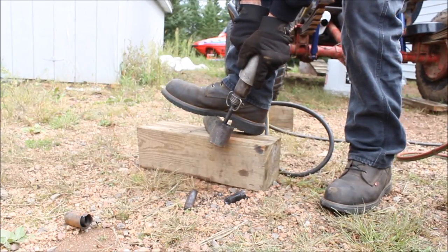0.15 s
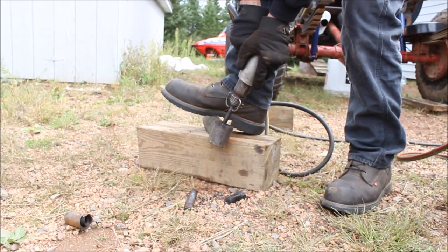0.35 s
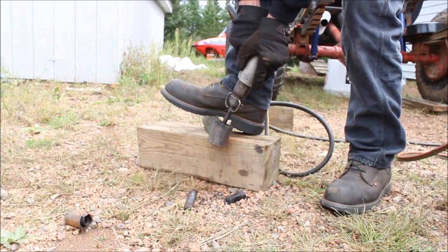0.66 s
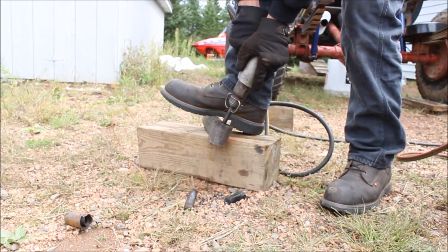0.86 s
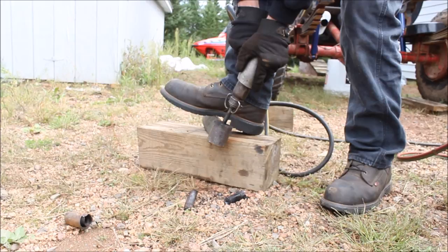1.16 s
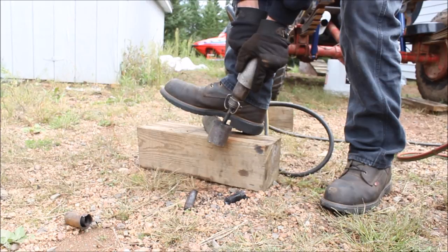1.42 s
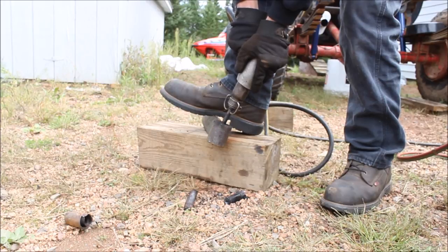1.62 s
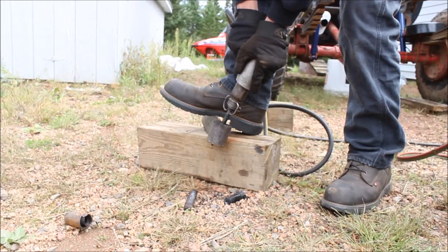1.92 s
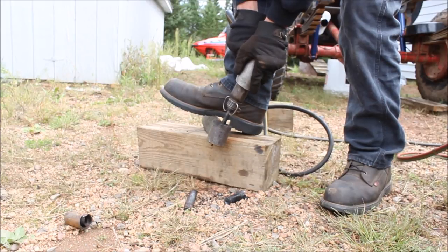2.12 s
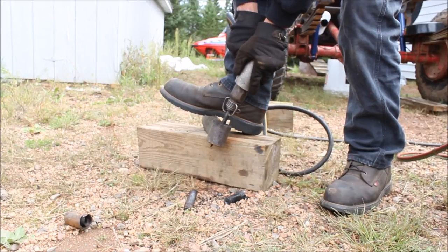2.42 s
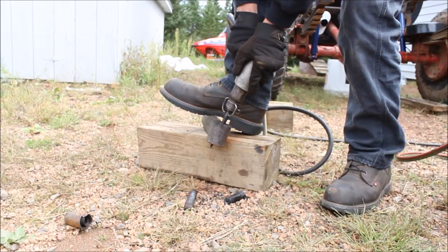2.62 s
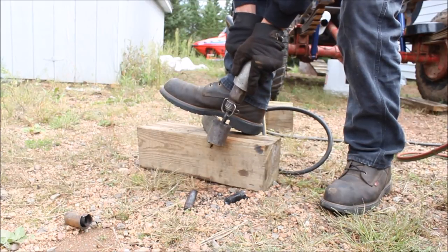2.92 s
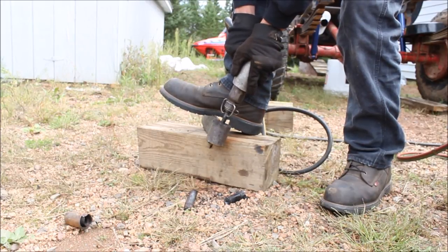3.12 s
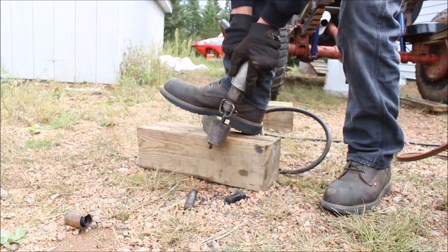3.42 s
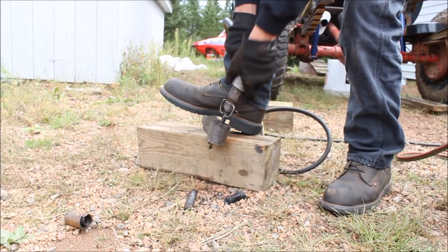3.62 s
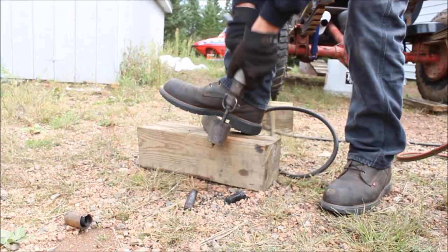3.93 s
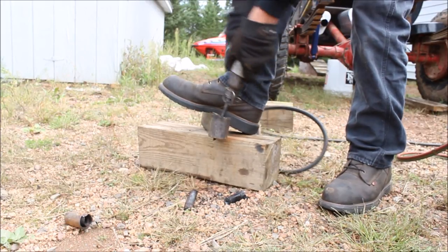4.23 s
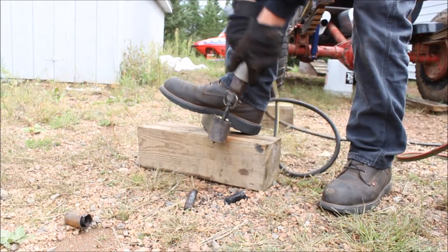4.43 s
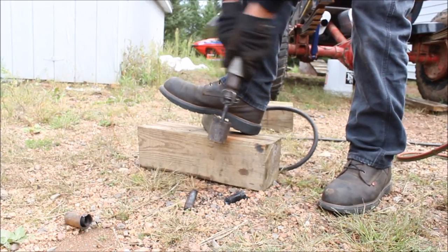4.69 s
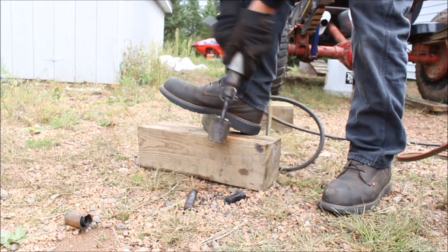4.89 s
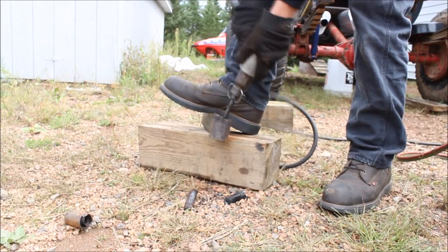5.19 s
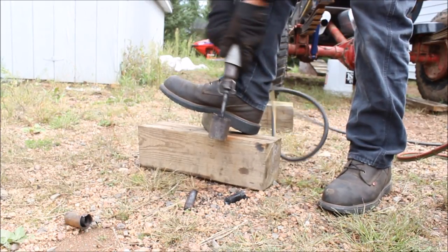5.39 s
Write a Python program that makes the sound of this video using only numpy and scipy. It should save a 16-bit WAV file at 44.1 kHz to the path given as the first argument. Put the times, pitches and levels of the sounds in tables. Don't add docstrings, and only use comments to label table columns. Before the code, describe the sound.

From the start an air hammer runs at full blast, close to a stereo microphone in an open yard. Roughly 43 strokes a second merge into a rough, buzzing rattle: each a dry exhaust pop, a hard piston crack ringing the steel, loose chatter and a puff of hissing air. At first the chisel rings bright and high; from about 1 to 2 seconds it sinks in and sounds tighter and lower. The pace sags gradually to about 40 strokes, the split liner adds a hollow, mid-pitched clang by 3 seconds, and the tool stumbles and stalls near 3.5. A short yard echo dies away. From about 3.6 to 4.2 faint distant wash swells up, with low, soft wind buffets. Small uneven ticks and clanks of the tool in metal follow, mostly from 4.3 to 5.3. At 5.49 a brief whistling valve hiss leads to a single pop at 5.55.

```python
import sys
import numpy as np
from scipy import signal
from scipy.fft import rfft, irfft
from scipy.io import wavfile
from scipy.ndimage import uniform_filter1d

SR = 44100
rng = np.random.default_rng(int(sys.argv[2]) if len(sys.argv) > 2 else 0)


def transcribe(u):
    v = np.clip(np.atleast_2d(u).T, -1, 1)
    q = np.round(v * 32767).astype(np.int16)
    wavfile.write(sys.argv[1], SR, q)


def boost(x):
    u = np.asarray(x, float) / 20
    return 10 ** u


N = 244755
TIME = np.arange(N) / SR

# time_s, air_pressure_db, lean_on_chisel_db, liner_split (0-1)
FORCE = [(0, -32, -30, 0.08), (.5, -32, -27, 0.15), (1.2, -31.5, -26, .2), (1.75, -30.5, -28.5, 0.26),
         (2.05, -32, -28.5, 0.2), (2.3, -34, -29, 0.4), (2.8, -33, -28, 0.5), (2.97, -34.5, -30.5, 1),
         (3.2, -32, -30.5, 0.97), (3.33, -30.5, -31, 0.86), (3.44, -33.5, -33.5, 0.85)]
# pitch_hz, width_hz, level_db
LINER = [(1620, 190, 0)]


def evened(x):
    return x / np.sqrt(np.mean(x ** 2) + 1e-20)


def curve(rows, column):
    return np.interp(TIME, [r[0] for r in rows], [r[column] for r in rows])


def coloured(x, points):
    f, db = np.transpose(points)
    hz = abs(np.fft.fftfreq(4096, 1 / SR))
    gain_db = np.interp(np.log(hz + 1), np.log(f), db)
    log_gain = np.log(boost(np.maximum(gain_db, -90)))
    taps = np.fft.ifft(np.exp(np.conj(signal.hilbert(log_gain)))).real[:2048]
    return signal.oaconvolve(x, taps.reshape((1,) * (x.ndim - 1) + (-1,)), axes=-1)[..., :N]


def low_cut(x, hz):
    return signal.sosfilt(signal.butter(2, hz, "high", fs=SR, output="sos"), x)


def ring(x, modes):
    out = np.zeros(len(x))
    for hz, width_hz, db in modes:
        r, w = np.exp(-np.pi * width_hz / SR), 2 * np.pi * hz / SR
        out += boost(db) * signal.lfilter([0, r * np.sin(w)], [1, -2 * r * np.cos(w), r * r], x)
    return out


def drooping_ring(x, modes, pitch):
    out = np.zeros(len(x))
    for hz, width_hz, db in modes:
        turn = np.exp(2j * np.pi * np.cumsum(hz * pitch) / SR)
        decayed = signal.lfilter([1], [1, -np.exp(-np.pi * width_hz / SR)], x / turn)
        out += boost(db) * (turn * decayed).imag
    return out


def clicks(seconds, sizes):
    at, out = np.clip(seconds * SR, 0, N - 2), np.zeros(N)
    np.add.at(out, at.astype(int), sizes * (1 - at % 1))
    np.add.at(out, at.astype(int) + 1, sizes * (at % 1))
    return out


def humps(train, width_ms):
    hump = np.exp(-.5 * (np.arange(-40, 41) / SR * 1000 / width_ms) ** 2)
    return signal.oaconvolve(train, hump, "same")


def since(at):
    return TIME - np.r_[-9, at][np.searchsorted(at, TIME, "right")]


def ports(x, lag_s):
    hz = np.fft.rfftfreq(N + 45, 1 / SR)
    later = rfft(x, N + 45) * np.exp(-2j * np.pi * hz * lag_s)
    return np.array([x, irfft(later, N + 45)[:N]])


def stroke_times():
    # stroke_number, cycle_ms
    pace = [(0, 22.983), (29, 23.432), (40, 23.759), (64, 24.411), (80, 24.299), (83, 24.608), (87, 24.044),
            (101, 24.494), (104, 25.245), (118, 24.494), (125, 25.553), (129, 25.352), (139, 26.984),
            (141, 30.191)]
    first_pop_s, jitter_s = .00848, .0001
    stroke, cycle_ms = np.transpose(pace)
    cycles = np.interp(np.arange(stroke[-1] + 1), stroke, cycle_ms) / 1000
    steady = first_pop_s - cycles[0] + np.r_[0, np.cumsum(cycles)]
    return steady + jitter_s * rng.standard_normal(len(cycles) + 1)


def return_times(at):
    slow = np.diff(at, prepend=2 * at[0] - at[1]) - .0243
    return at + .0113 + 0.67 * slow + 77.0 * slow ** 2


def slower_s(at):
    return .3 * (np.gradient(at) - .024)


def pops(at):
    # delay_ms, signed_gain
    echoes = [(0, 1.5), (.5, -.25), (1.45, -.95), (2.9, .28), (3.2, .15), (4.2, .42), (6.0, -.24),
              (9.4, .2)]
    # pitch_hz, width_hz, level_db
    port_modes = [(983, 104, -11), (1150, 150, -4.5)]
    # pitch_hz, width_hz, level_db
    block = [(84.4, 30, -28), (179, 21.5, -40), (211, 33, -32.5), (294.3, 24.7, -30.5), (407, 47, -29.5),
             (526, 203, -18.5)]
    size = boost(.7 * rng.standard_normal((len(at), 2)))
    back = clicks(return_times(at) + .00008 * rng.standard_normal(len(at)), size[:, 1])
    out = humps(clicks(at, size[:, 0]), width_ms=.11)
    puff = out - 0.48 * humps(back, width_ms=0.093)
    blow_s = at + 0.00393 + 0.0003 * rng.standard_normal(len(at))
    thud = clicks(blow_s, 0.71 * rng.standard_normal(len(at)))
    pace = uniform_filter1d(np.interp(TIME, at, .024 / np.gradient(at)), 3000)
    droop = pace ** 0.72
    delay_ms, gain = np.array(echoes).T
    pattern = clicks(delay_ms / 1000, gain)[:600]
    body = evened(signal.oaconvolve(puff, pattern)[:N] + drooping_ring(puff, block, droop))
    port = evened(np.gradient(ring(out + thud, port_modes)))
    raised_port = evened(np.gradient(ring(out, LINER)))
    split = curve(FORCE, column=3)
    both = body + boost(-1.5 - 14 * split) * port + boost(-23 + 19.3 * split) * raised_port
    return low_cut(low_cut(boost(curve(FORCE, column=1)) * both, 175.), 60.)


def steel(at):
    # pitch_hz, width_hz,
    # level_db, from_s, to_s
    steel_modes = [(2330, 100, 0, -1, 1.3), (2630, 75, 3, -1, 1.6), (3250, 50, -7, -1, 1.0),
                   (5090, 140, -4, -1, 1.0), (5285, 40, 2, -1, 1.1), (5670, 70, 4, -1, 1.0),
                   (5890, 50, -1, -1, 1.3), (6610, 80, -7, -1, 1.0), (4610, 80, -5, .3, 1.1),
                   (4292, 60, 4, .45, 1.1), (4248, 60, 5, 1.05, 1.95), (8100, 250, -12, .5, 1.9),
                   (2440, 200, 2, 1.2, 4), (4520, 120, -4, 1.1, 1.9), (3000, 60, -3, 1.3, 2.2),
               (3490, 75, 2, 1.8, 3.1), (2590, 90, -1, 2.2, 3.4), (3200, 60, -4, 2.2, 4),
               (3800, 400, -8, 1.3, 2.95), (4260, 100, -5, 2.1, 2.95), (5100, 370, -9, 2.1, 4),
               (6200, 280, -2, 3.25, 4)]
    # time_s, level_db
    rattle = [(0, 17.5), (1.0, 10.5), (1.8, 15.5), (2.3, 11), (2.9, 12.5), (3.45, 6)]
    # pitch_hz, level_db per Hz
    crack_colour = [(1000, -51), (1450, 11), (1900, -3.5), (2400, 6), (3900, -4.5), (5500, 1.5),
                    (7000, -2.5), (9000, -8), (16000, -17.5)]
    travel_s, contact_ms = .0021, 13.6
    luck = rng.standard_normal((len(at), 4))
    blow = at + travel_s + slower_s(at) + .00006 * luck[:, 0]
    age_ms = 1000 * since(blow)
    latest = np.maximum(np.searchsorted(blow, TIME, "right") - 1, 0)
    strength = boost(.7 * luck[:, 1])[latest]
    loose = rng.standard_normal(N) * boost(2.0 * np.minimum(rng.exponential(1, N), 3)) * (rng.random(N) < .3)
    rebound = np.exp(-((age_ms - 4.6) / .8) ** 2)
    crush = np.clip(age_ms / .4, 0, 1) * np.exp(-(age_ms / 1.7) ** 2)
    contact = np.exp(-age_ms / 20.0 - (age_ms / contact_ms) ** 4) * (1 - crush)
    chatter = boost(curve(rattle, 1)) * (contact + .5 * rebound) + 0.52 * (age_ms < 24)
    grind = loose * strength * (crush + chatter)
    knock = clicks(blow + .0003, boost(.8 * luck[:, 2]))
    clean = evened(knock) + .5 * evened(grind)
    rings = np.zeros(N)
    for hz, width_hz, db, start, end in steel_modes:
        fade_in = np.clip((TIME - start) / .3 + .5, 0, 1)
        fade_out = np.clip((end - TIME) / .3 + .5, 0, 1)
        rings += width_hz * ring(clean * fade_in * fade_out, [(hz, width_hz, db)])
    liner_db = curve(FORCE, column=1) - 9 + 6.5 * curve(FORCE, column=3)
    liner = boost(liner_db) * evened(ring(clean, LINER))
    crack = coloured(5.5 * knock + .5 * grind, crack_colour)
    chisel = evened(evened(rings) + evened(crack))
    return low_cut(liner + boost(curve(FORCE, column=2) + 1.5) * chisel, 1100.)


def escaping_air(at):
    # pitch_hz, level_db per Hz
    air_colour = [(45, -19), (1500, -10), (3000, -6), (4500, 0.5), (8000, 1), (12500, -8), (15800, -16),
                  (17000, -35)]
    out_ms = 1000 * since(at - .0003 + slower_s(at))
    back_ms = 1000 * since(return_times(at) - .0012)
    swell = np.exp(-abs(out_ms - 3.1) / np.where(out_ms < 3.1, 2.6, 1.6)) * np.clip(out_ms / .5, 0, 1)
    back = .4 * np.clip(back_ms / 1.2, 0, 1) * np.exp(-np.maximum(back_ms - 1.2, 0) / 3.5)
    leak = 0.09 * (TIME < at[-1] + .02)
    shared = ports(rng.standard_normal(N), 5.5e-5)
    hiss = coloured(shared + 0.57 * rng.standard_normal((2, N)), air_colour)
    thin = 0.43 * np.diff(hiss, prepend=0)
    level_db = -26.5 + 0.74 * (curve(FORCE, column=1) + 32.5)
    return boost(level_db) * evened((swell + leak) * hiss + back * thin)


def clinks():
    # time_s, peak_db, ring_pitch_hz, t60_s, chisel_ring_db
    knocks = [(3.821, -49, 3100, .06, 0), (3.962, -30, 10600, 0.02, -3), (3.967, -41.5, 373, 0.075, -27),
              (4.275, -22, 13000, .025, -6), (4.306, -28.5, 3220, 0.23, 12), (4.311, -19, 12400, 0.03, -31),
              (4.322, -22, 10100, 0.016, -20), (4.506, -36, 9000, .02, 2), (4.5557, -21, 920, 0.05, 4),
              (4.639, -36, 227, 0.069, -26), (4.6535, -16.5, 3140, 0.079, 29),
              (4.781, -17.5, 11700, 0.015, -15), (4.937, -33, 8600, .02, -1), (5.015, -27, 9000, 0.033, 2),
              (5.0502, -25.5, 2120, 0.025, -5), (5.22, -24, 1660, 0.18, 7), (5.2505, -25, 1410, 0.031, 19),
              (5.261, -25.5, 3700, 0.044, 14), (5.295, -30, 9000, .02, -13), (5.3, -24, 6150, 0.059, -23)]
    # pitch_hz, width_hz, level_db
    chisel = [(1420, 160, -29), (2670, 350, -16.5), (2980, 220, -4.5), (4100, 440, 0), (5240, 1500, 7),
              (7600, 3300, -13)]
    out, t = np.zeros(N), np.arange(5000) / SR
    for s, db, hz, t60, chisel_db in knocks:
        grit = rng.standard_normal(len(t)) * boost(-60 * t / t60) + 4.1 * (t == 0)
        knock = evened(ring(grit, [(hz, 0.12 * hz, 0)])) + boost(chisel_db) * evened(ring(grit, chisel))
        tick = boost(-3.0) * min(hz / 1000, 1) * np.diff(grit, prepend=0) * np.exp(-1000 * t / 1.5) / 3
        out[round(s * SR):][:len(t)] += boost(db + 1.5) * (knock / abs(knock).max() + tick)
    return out


def trigger():
    # pitch_hz, level_db per Hz
    leak_colour = [(1760, -18.5), (3000, -14), (3490, -25), (3940, 1), (4250, -9.5), (6120, -10.5),
                   (7370, -14.5), (12000, -22), (15600, -67), (22000, -120)]
    # time_s, height
    restart = (5.5497, .13)
    open_s, hold_s = 5.486, 0.035
    rise_db = np.minimum(380.0 * (TIME - open_s), 0)
    choke_db = 550.0 * (open_s + hold_s - TIME)
    level_db = -29 + np.minimum(rise_db, choke_db)
    hiss = evened(coloured(rng.standard_normal(N), leak_colour)) * boost(np.maximum(level_db, -150))
    return hiss + restart[1] * humps(clicks(np.array(restart[:1]), 0.95), width_ms=0.15)


def ground_dip(x):
    # pitch_hz, width_hz, depth (0-1)
    dip = (1415, 460, 0.87)
    hz, width_hz, depth = dip
    return x - depth * signal.lfilter(*signal.iirpeak(hz, hz / width_hz, fs=SR), x)


def yard_echo(x):
    t, out = np.arange(10000) / SR, np.zeros((2, N))
    bass = signal.lfilter(*signal.butter(1, 1100., fs=SR), x)
    for k in range(3):
        taps = rng.standard_normal((2, len(t))) * (rng.random((2, len(t))) < .05)
        low = signal.lfilter(*signal.butter(2, 1500., fs=SR), taps)
        taps = taps - low + (low + 0.37 * low[::-1]) / 1.06
        low = (low + 0.27 * low[::-1]) / 0.71
        tail = low * boost(-60 * t / .24) + (taps - low) * boost(-60 * t / .19)
        tail = tail * (t > .004)
        blend = np.sqrt(2 / 3) * np.cos(2 * np.pi * (1.3 * TIME + k / 3))
        sent = (x - bass) * blend + bass * (k == 0)
        out += signal.fftconvolve(sent[None], tail / np.linalg.norm(tail[0]), axes=1)[:, :N]
    return out


def mic_gain_db():
    duck_db, recover_s, recover_db_per_s, knee_s = -24, 3.59, 37, 0.049
    climb = np.clip(duck_db + recover_db_per_s * (TIME - recover_s), duck_db, 0)
    return uniform_filter1d(climb, int(knee_s * SR) + 1)


def gusting():
    # time_s, peak_db, half_length_s
    gusts = [(4.184, -46, 0.038), (4.334, -35.5, .04), (4.48, -41, 0.04), (4.612, -31, 0.07),
             (4.736, -32, .05), (4.834, -36, .03), (4.93, -33, 0.028), (5.046, -39, 0.061),
             (5.14, -34.5, 0.028), (5.303, -42, 0.11), (5.47, -48, .04)]
    breeze_db, from_s = -57, 3.95
    power = boost(breeze_db) ** 2 * np.clip((TIME - from_s) / 0.055 + .5, .001, 1)
    for s, db, half_s in gusts:
        power = power + boost(db) ** 2 * np.exp(-((TIME - s) / half_s) ** 2)
    return np.sqrt(power)


def wind():
    lumps = boost(1.5 * evened(uniform_filter1d(rng.standard_normal((2, N)), 3000)))
    raw = rng.standard_normal((3, N))
    buffet = coloured(raw[:2] + 0.18 * raw[2],
                      [(12, -16), (28, 0.5), (60, -14.0), (130, -35), (300, -42), (900, -75)])
    return gusting() * boost(mic_gain_db() / 2 + [[1.5], [4.0]]) * evened(lumps * buffet)


def yard():
    # pitch_hz, level_db per Hz
    wash_colour = [(53, -13), (90, -7), (169, -0.5), (400, -8.5), (446, -6.5), (644, -4), (1010, -10.5),
                   (1290, -5.5), (2030, -15), (3710, -9.5), (6110, -19), (6950, -19), (15800, -29)]
    own, shared = rng.standard_normal((2, N)), ports(rng.standard_normal(N), 4e-5)
    flicker = boost(1.26 * evened(uniform_filter1d(rng.standard_normal(N), 900)))
    wash = evened(coloured(0.96 * own + shared, wash_colour))
    return boost(-40.5 + mic_gain_db() + [[1.9], [3.9]]) * flicker * wash


def scene():
    at = stroke_times()
    puffs, metal = ground_dip(pops(at)), ground_dip(steel(at))
    small = clinks() + trigger()
    direct = ports(puffs + metal, 5.5e-5) + escaping_air(at) + ports(small, 4e-5)
    echo = yard_echo(boost(-8.0) * puffs + boost(-7.0) * metal + boost(-17.0) * small)
    return (direct + echo + yard() + wind()) * boost([[-.3], [.3]])


def top_cut(x):
    return signal.sosfilt(signal.butter(12, 15860, fs=SR, output="sos"), x)


def record(dry):
    cut = signal.lfilter(*signal.butter(1, 15., "high", fs=SR), dry)
    limited = .8 * np.tanh(cut / .8)
    edge = signal.firwin(255, 16000, window=("kaiser", 8), fs=SR)
    mix = signal.oaconvolve(limited, edge[None], "same")
    return top_cut(mix)


dry = scene()
out = record(dry)
transcribe(out)
```